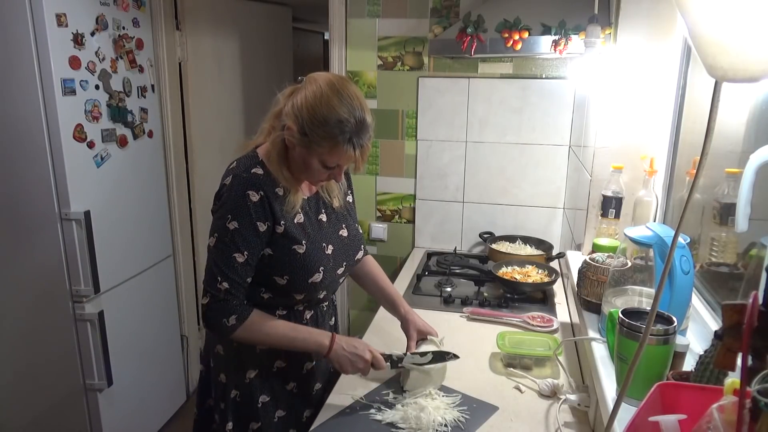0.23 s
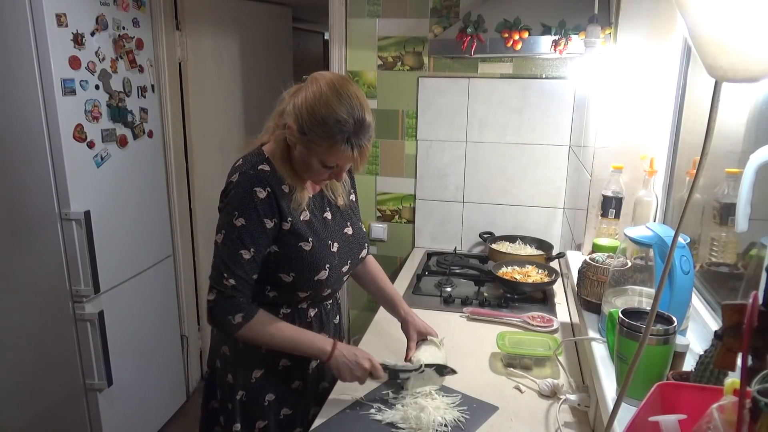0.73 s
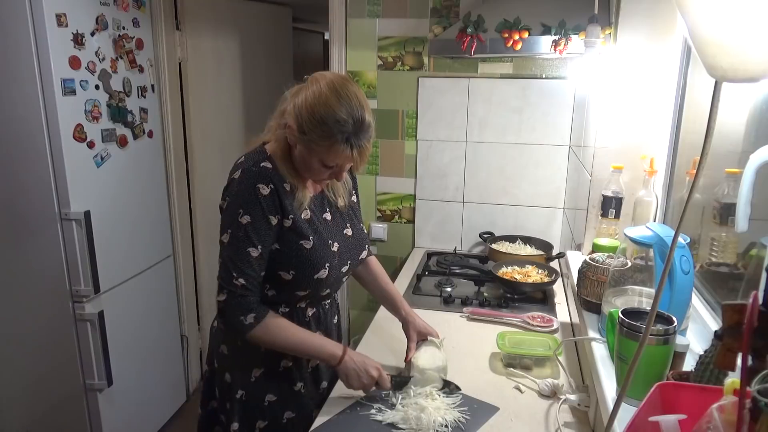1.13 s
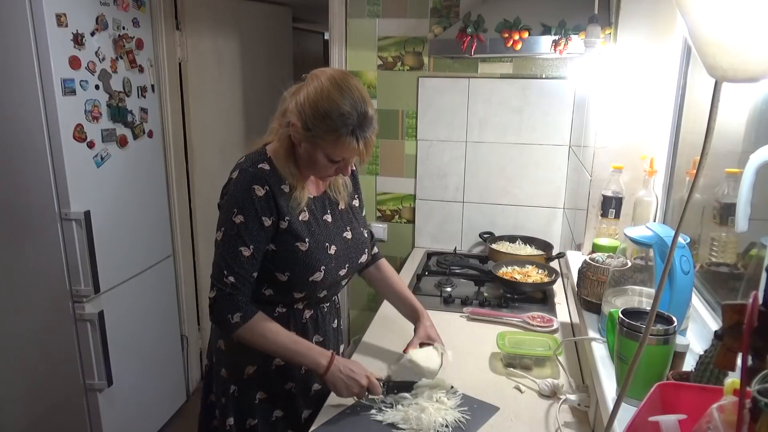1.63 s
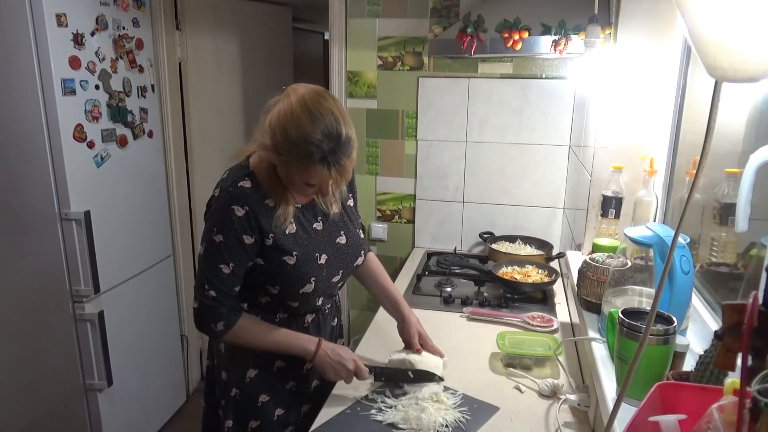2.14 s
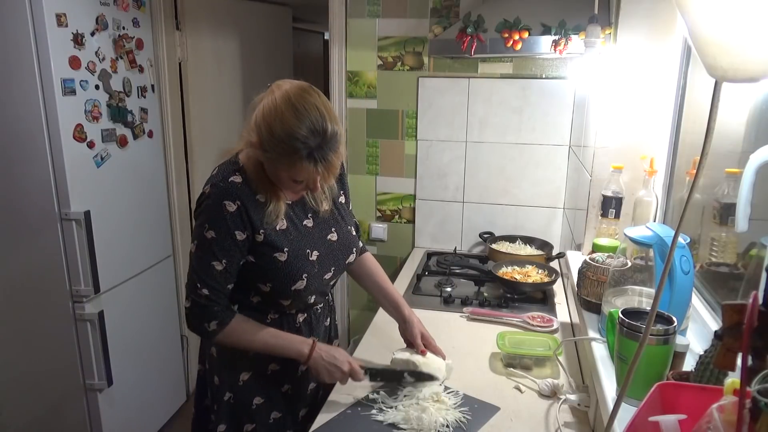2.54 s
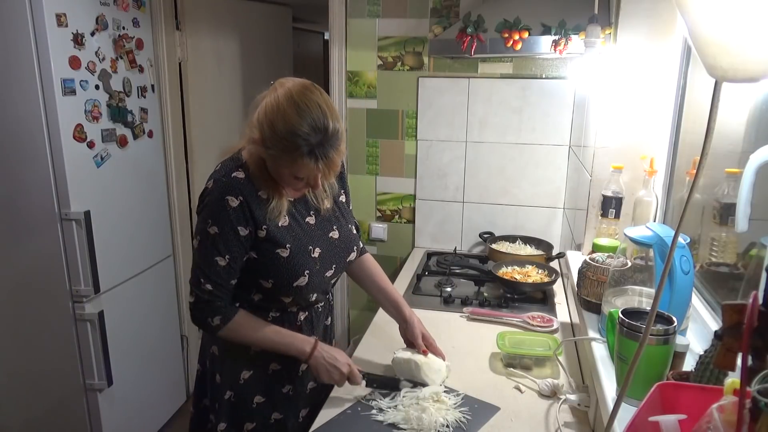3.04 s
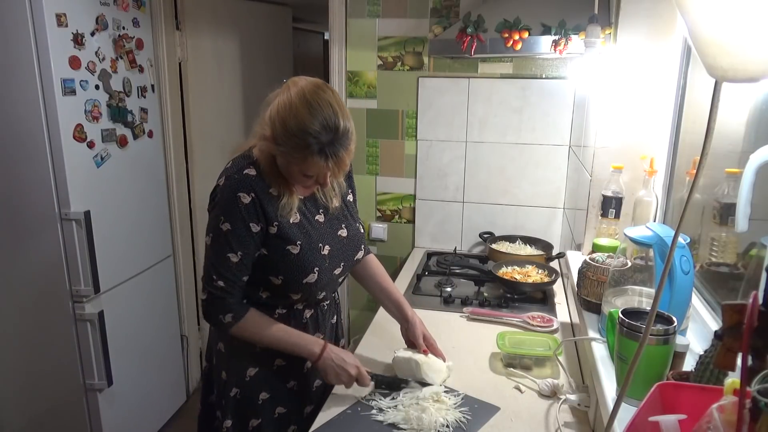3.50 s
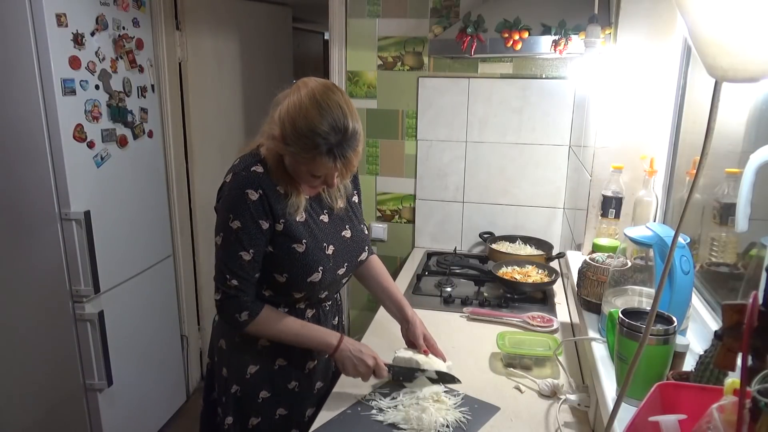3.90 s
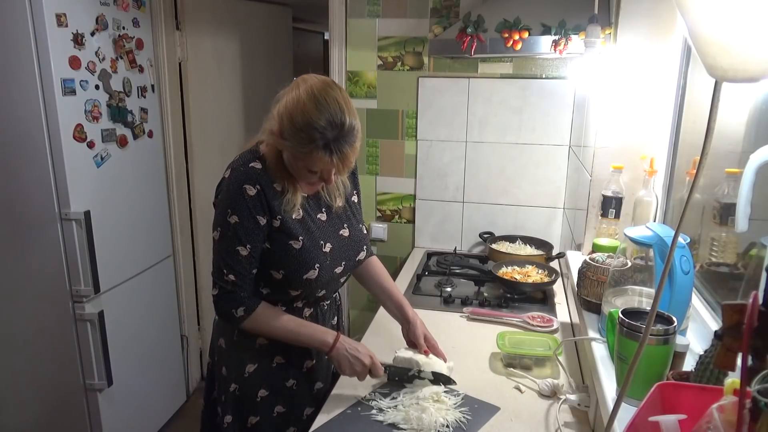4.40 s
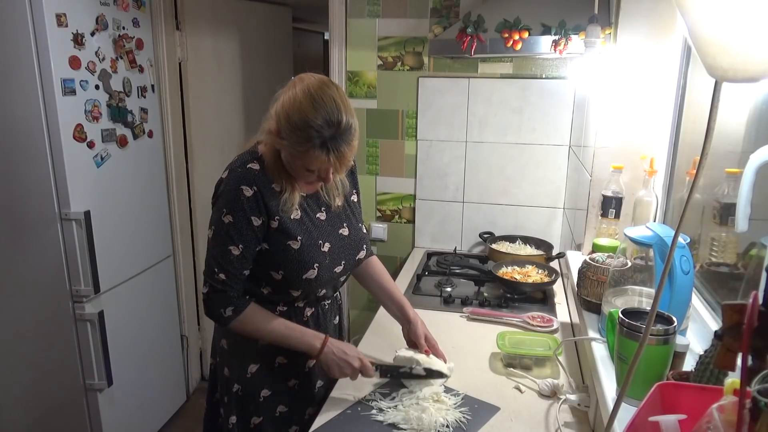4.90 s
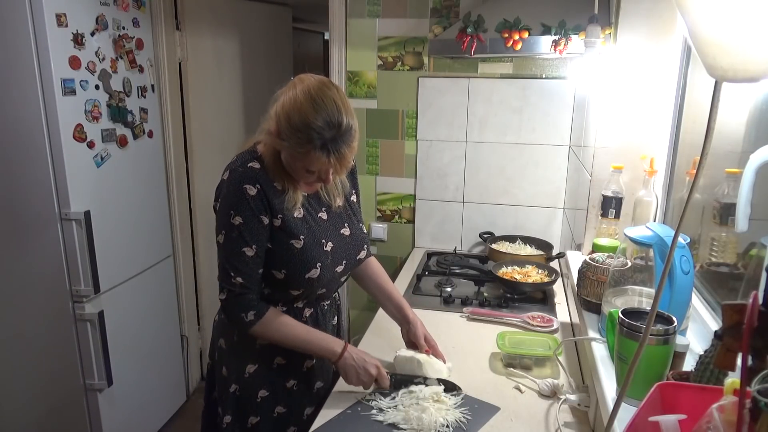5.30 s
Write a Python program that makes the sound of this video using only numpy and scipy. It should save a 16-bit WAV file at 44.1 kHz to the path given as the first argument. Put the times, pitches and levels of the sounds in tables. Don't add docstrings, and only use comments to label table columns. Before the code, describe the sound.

Steady frying hiss fills a compact, hard-walled kitchen. Near the microphone, crunchy leaf-splitting strokes alternate with five loud, dry knife blows on a board, leaving a faint hum from nearby ware. Small snaps, light taps and thin metallic blade singing fall between them. The stereo recording is close, with loud peaks firmly limited.

```python
import sys
import numpy as np
from scipy import signal
from scipy.io import wavfile
from scipy.ndimage import uniform_filter1d, minimum_filter1d

SR = 44100
rng = np.random.default_rng(int(sys.argv[2]) if len(sys.argv) > 2 else 0)


def level_to_linear(level):
    exponent = np.asarray(level, float) / 20
    return 10 ** exponent


def to_wav(sig):
    pcm = np.clip(np.atleast_2d(sig), -1, 1) * 32767
    pcm = np.round(pcm).astype(np.int16)
    wavfile.write(sys.argv[1], SR, pcm.T)


N = 244754

# time in s, force over the limiter ceiling in dB,
# hardness as a factor on pitch, level of the humming ware in dB.
BLOWS = [
    (1.2, 6, 0.86, -33),
    (2.3224, 12.5, 0.95, -30),
    (2.889, 6, 0.73, -33.5),
    (3.4097, 11, 1.014, -35),
    (5.2901, 11.5, 1.09, -36),
]
# frequency in # Hz, side relative to mid in dB.
SPREAD = [(60, -19), (120, -22), (240, -18), (480, -13), (950, -6), (1890, -9), (3770, -7), (7520, -8),
          (15000, -20.5)]
CEILING_DB = -6.5
USUAL_DB = -32
BLADE_DB = -1


def evened(x):
    return x / np.sqrt(np.mean(x ** 2) + 1e-20)


def read(points, hz):
    f, value = np.transpose(points)
    return np.interp(np.log(hz + 1), np.log(f + 1), value)


def add(mix, s, sound):
    part = mix[round(s * SR):][:len(sound)]
    part += sound[:len(part)]


def colour(x, points):
    gain_db = read(points, abs(np.fft.fftfreq(4096, 1 / SR)))
    log_gain = np.log(level_to_linear(np.maximum(gain_db, -100)))
    taps = np.fft.ifft(np.exp(np.conj(signal.hilbert(log_gain)))).real[:2048]
    return signal.oaconvolve(x, taps)[:len(x)]


def resonate(x, hz, width):
    return signal.lfilter(*signal.iirpeak(hz, hz / width, SR), x)


def rings(modes):
    t = np.arange(SR) / SR
    return sum(level_to_linear(db - 60 * t / t60) * np.sin(2 * np.pi * hz * t) for hz, db, t60 in modes)


def cracks(per_s, spread_db):
    size = level_to_linear(spread_db * np.minimum(rng.exponential(1, N), 5))
    size = size * rng.choice([-1., 1.], N)
    return evened(size * (rng.random(N) < per_s / SR))


def lumps(ms, depth_db):
    slow = uniform_filter1d(rng.standard_normal(N), int(ms * SR / 1000))
    return level_to_linear(depth_db * evened(uniform_filter1d(slow, 60)))


def tail():
    # frequency in Hz, reverberation time t60 in s.
    decay = [(150, 0.21), (400, 0.28), (1000, 0.26), (2800, 0.2), (8000, 0.12)]
    taps = np.zeros(SR // 2)
    at = np.arange(60, len(taps) - 20, 20)
    taps[at + rng.integers(0, 20, len(at))] = rng.choice([-1., 1.], len(at))
    hz, t, z = signal.stft(taps, SR, nperseg=256)
    fading = z * level_to_linear(-60 * t / read(decay, hz)[:, None])
    out = signal.istft(fading, SR, nperseg=256)[1]
    return out / np.linalg.norm(out)


def kitchen(x, wet_db, side_db):
    mid = x + level_to_linear(wet_db) * signal.oaconvolve(x, tail())[:N]
    side = level_to_linear(side_db) * colour(signal.oaconvolve(x, tail())[:N], SPREAD)
    return np.array([level_to_linear(-0.5) * (mid + side), mid - side])


def pans():
    # frequency in Hz, density in dB per Hz.
    spectrum = [(40, -44), (100, -24), (160, -25), (270, -25.5), (380, -11), (600, -11), (1000, -9.5),
                (1900, -3.5), (3500, -3.5), (6000, -1.5), (8700, 2), (11000, -5.5), (13500, -13),
                (16000, -21.5)]
    # time in s, sizzle level in dB.
    heating = [(0.0, -40.5), (0.46, -39.5), (4.48, -39.5), (4.71, -38.5), (4.88, -38.5), (5.18, -40.5),
               (5.55, -41)]
    s, db = np.transpose(heating)
    heat = level_to_linear(np.interp(np.arange(N) / SR, s, db - db.mean()))

    def boiling():
        hiss = rng.standard_normal(N) * lumps(11.5, 0.27)
        return colour(hiss + 0.29 * cracks(700, 3.8), spectrum)

    mid = boiling()
    side = level_to_linear(-0.5) * colour(boiling(), SPREAD)
    return level_to_linear(-39.5) * heat * np.array([level_to_linear(-0.5) * (mid + side), mid - side]) / mid.std()


def stroke_gains():
    # time of the peak in s, rise in s, fall in s,
    # crackle in dB, fleshy crunch relative to crackle in dB.
    strokes = [(.422, 0.062, 0.12, -35, -11.5), (.674, 0.11, 0.092, -33.5, -14.5),
               (.89, 0.019, 0.037, -38, -10), (0.924, 0.067, 0.1, -29.5, -10), (1.148, .018, .03, -32, -23),
               (1.45, 0.044, 0.093, -61.5, 13.5), (1.266, 0.024, 0.024, -33, 1.5),
               (1.357, 0.12, 0.15, -44, 1.5), (2.19, 0.026, 0.056, -48.5, 3), (2.93, 0.061, 0.13, -39, 3.5),
               (3.45, .04, 0.052, -42, 10.5), (3.987, 0.16, .1, -30, -6), (4.612, .12, 0.092, -26.5, -8),
               (4.745, 0.053, 0.039, -41, -7), (4.79, .03, 0.046, -34, -7),
               (4.843, 0.0054, 0.043, -27, -19), (5.167, 0.11, 0.058, -31, -3),
               (5.225, 0.052, 0.13, -35, -2.5), (5.358, 0.053, 0.13, -41, 3)]
    t, gains = np.arange(N) / SR, np.zeros((3, N))
    for s, rise, fall, db, crunch_db in strokes:
        swell = -21 * (abs(t - s) / np.where(t < s, rise, fall)) ** 1.6
        ring_db = -18 + 0.23 * crunch_db - 0.93 * (db - USUAL_DB)
        shares_db = [swell, crunch_db + swell, ring_db + BLADE_DB + swell]
        gains += level_to_linear(db + np.maximum(shares_db, -200))
    return gains


def cut_gains():
    # length in s, level at entry in dB, level at the board in dB,
    # crunch relative to crackle in dB, blade ring relative to crackle in dB.
    cuts = [
        (0.089, -48, -16, -6, -21),
        (0.1, -43.5, -25.5, -4, -19),
        (0.14, -49, -18, -3.5, -36),
        (0.14, -50, -21, -2.5, -11),
        (0.0365, -31, -29, 4.5, 4.5),
    ]
    bite_s, parting_s = 0.007, 0.00089
    t, gains = np.arange(N) / SR, np.zeros((3, N))
    for (length, entry_db, board_db, crunch_db, ring_db), (s, *_) in zip(cuts, BLOWS):
        depth = (t - s + length) / length
        on = np.clip(depth * length / bite_s, 0, 1) * (t < s - parting_s)
        level = level_to_linear(entry_db + (board_db - entry_db) * np.clip(depth, 0, 1))
        gains += on * level * level_to_linear(np.array([[0], [crunch_db], [ring_db + BLADE_DB]]))
    return gains


def drag_gain():
    # time of the peak in s, half length in s, ring in dB.
    drags = [
        (2.813, 0.032, -40),
        (3.908, 0.051, -45),
        (3.99, 0.037, -53),
        (4.805, .02, -55),
        (5.17, 0.028, -43),
    ]
    t = np.arange(N) / SR
    return sum(level_to_linear(db) * np.exp(-((t - s) / half) ** 2) for s, half, db in drags)


def board_push(crackle_gain):
    keep = np.exp(-1 / (0.0083 * SR))
    effort = (crackle_gain / level_to_linear(USUAL_DB)) ** 0.79
    force = level_to_linear(-65.5) * signal.lfilter([1 - keep], [1, -keep], effort)
    board = evened(resonate(resonate(rng.standard_normal(N), 177, 22), 116, 64))
    counter = evened(resonate(resonate(rng.standard_normal(N), 90, 50), 85, 70))
    return force * (board + level_to_linear(-13) * counter)


def slicing():
    # frequency in Hz, density in dB per Hz.
    leaf_spectrum = [(1180, -67), (2000, -71), (2670, -0.5), (3610, -4), (4690, 0.5), (5630, 4), (6040, 1),
                     (9170, 7.5), (15100, -11), (16000, -40)]
    rib_spectrum = [(150, -61), (250, -22.5), (391, -7), (758, -7), (1070, 5.5), (1170, 0.5), (1840, 6.5),
                    (3200, -0.5), (4160, 1), (7040, -120)]
    # frequency in Hz, width in Hz, level in dB.
    blade = [(5540, 110, 0), (7750, 150, -8), (9460, 160, -3), (11100, 200, -12)]
    gains = stroke_gains() + cut_gains()
    gains[2] += drag_gain()
    lump = lumps(5, 1.7)
    leaves = cracks(14000, 2.5) * lump
    steel = evened(sum(level_to_linear(db) * evened(resonate(leaves, hz, width)) for hz, width, db in blade))
    veins = resonate(cracks(4000, 2.6) * lumps(12, 3), 3100, 3600)
    crackle = evened(colour(leaves + level_to_linear(-4) * evened(veins), leaf_spectrum))
    crunch = evened(colour(cracks(3000, 2.6) * lump, rib_spectrum))
    crunch = crunch + level_to_linear(14.5) * resonate(crunch, 648, 43) + level_to_linear(8.5) * resonate(crunch, 351, 41)
    cabbage = (gains * [crackle, crunch, steel]).sum(0)
    return kitchen(cabbage + board_push(gains[0]), -2.5, -0.92)


def snaps():
    # time in s, peak in dB, centre in Hz, ring t60 in s.
    events = [(0.594, -22, 8360, 0.0074), (1.1308, -16.5, 9600, 0.012), (1.267, -19, 8100, 0.012),
              (1.3611, -18, 8500, 0.0096), (2.1214, -28, 8700, 0.012), (2.293, -12.5, 5000, 0.0089),
              (2.655, -25, 8740, 0.0088), (2.81, -13.5, 7910, 0.013), (3.1894, -44, 8540, 0.012),
              (3.69, -35, 9000, 0.01), (4.5201, -19, 9190, 0.014), (4.693, -19.5, 7510, 0.011),
              (4.7815, -21, 8950, 0.012), (4.7984, -19, 8260, 0.012), (4.8421, -8, 8000, 0.0034),
              (5.0836, -29, 8610, 0.009), (5.144, -19, 5250, 0.0097), (5.3454, -21, 8250, 0.012)]
    mix, t = np.zeros(N), np.arange(3000) / SR
    for s, db, hz, t60 in events:
        noise = rng.standard_normal(len(t))
        burst = resonate(noise * level_to_linear(-60 * t / t60) + 4 * (t == 0), hz, 0.22 * hz)
        burst = resonate(burst, hz, 0.67 * hz)
        add(mix, s, level_to_linear(db) * burst / abs(burst).max())
    return kitchen(mix, -1.5, -1.5)


def tapping():
    # time in s, peak in dB, centre in Hz, width in Hz.
    knocks = [(.873, -30, 1850, 900), (1.375, -33.5, 660, 252), (1.979, -30.5, 1720, 506),
              (2.05, -41.5, 620, 300), (2.19, -41, 1620, 500), (2.485, -31, 584, 202),
              (2.765, -45.5, 336, 60), (4.489, -53, 330, 59.7), (2.776, -35, 980, 700),
              (3.044, -34, 627, 199), (3.785, -36.5, 1050, 600), (4.729, -28, 1000, 1100),
              (4.8025, -14.5, 730, 790)]
    mix, t = np.zeros(N), np.arange(4000) / SR
    for s, db, hz, width in knocks:
        tap = (t == 0) + rng.standard_normal(len(t)) * level_to_linear(-14 - 60 * t / 0.056)
        tap = resonate(resonate(tap, hz, width), hz, 2 * width)
        add(mix, s, level_to_linear(db) * tap / abs(tap).max())
    return kitchen(mix, -4, -2.5)


def chopping():
    # frequency in Hz, level in dB.
    board_modes = [(376, -9), (440, -9), (655, 0), (745, -12), (857, -8), (1010, -8), (1058, -4),
                   (1335, -5), (1424, -9), (1568, -6), (1780, -14), (2080, -14), (2195, -14)]
    # frequency in Hz, density in dB per Hz.
    contact = [(40, -50), (160, -23), (250, -36.5), (330, -12), (650, -1.5), (1000, -1), (1500, 3.5),
               (1900, -1.5), (2400, -11), (3200, -23), (5000, -25), (9000, -31), (15000, -53)]
    # frequency in Hz, level in dB, t60 in s.
    bowl = [(560, 0, .75), (566, -9, .5), (160, -14, .4)]
    heard, ware = np.zeros((2, N)), np.zeros(N)
    click, t = np.eye(1, SR)[0], np.arange(SR) / SR
    hum = rings(bowl) * np.minimum(t / 0.07, 1)
    board = click + level_to_linear(-38) * rings([(hz, db, 0.07) for hz, db in board_modes])
    for s, db, hard, ware_db in BLOWS:
        rattle = rng.standard_normal(SR) * level_to_linear(-21.5 - 60 * t / 0.18)
        reach = [(hz * hard ** (hz > 1200), level) for hz, level in contact]
        shaped = colour(signal.oaconvolve(click + rattle, board)[:SR], reach)
        mix = np.zeros(N)
        add(mix, s, level_to_linear(CEILING_DB + db) * shaped / abs(shaped).max())
        heard += kitchen(mix, -8.5, -5.0)
        add(ware, s, level_to_linear(ware_db) * hum)
    return heard + ware


def scene():
    return pans() + slicing() + snaps() + tapping() + chopping()


def top_cut(x):
    return signal.sosfilt(signal.butter(12, 16660, fs=SR, output="sos"), x)


def record(dry):
    look_ahead, release_db_s = 100, 617
    peak = -minimum_filter1d(-abs(dry).max(0), size=2 * look_ahead + 1)
    fall = np.arange(N) * release_db_s / SR
    envelope_db = np.maximum.accumulate(20 * np.log10(peak + 1e-9) + fall) - fall
    over_db = np.maximum(envelope_db - CEILING_DB, 0)
    held = dry / level_to_linear(0.84 * uniform_filter1d(over_db, size=40))
    edge = signal.firwin(255, 15750, fs=SR)
    return top_cut(signal.oaconvolve(held, edge[None], "same"))


dry = scene()
out = record(dry)
to_wav(out)
```